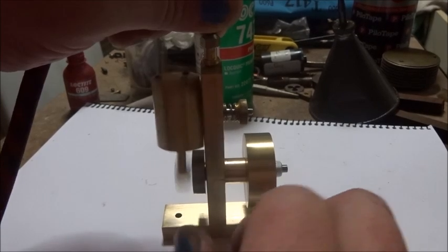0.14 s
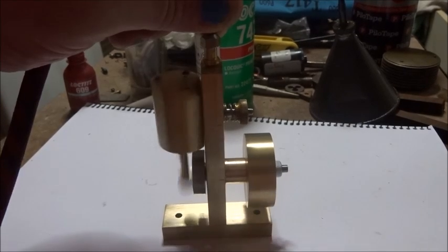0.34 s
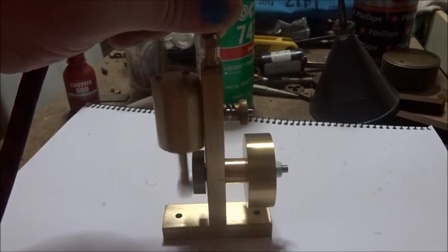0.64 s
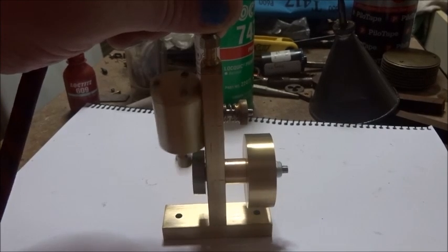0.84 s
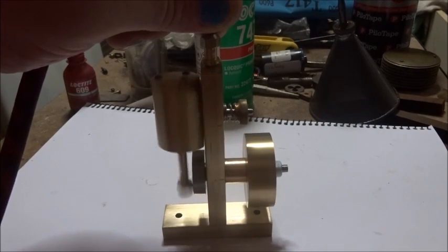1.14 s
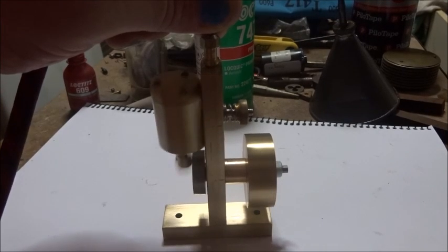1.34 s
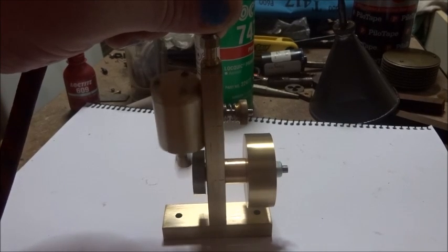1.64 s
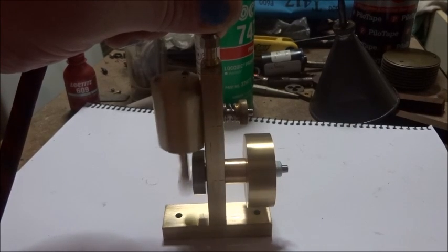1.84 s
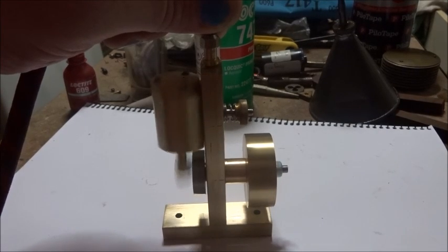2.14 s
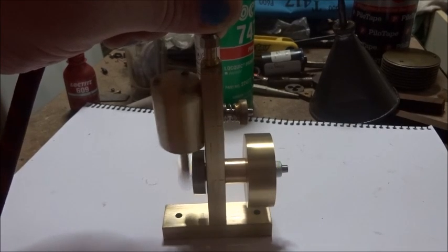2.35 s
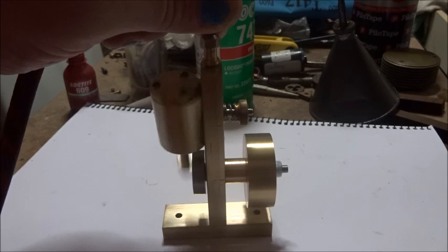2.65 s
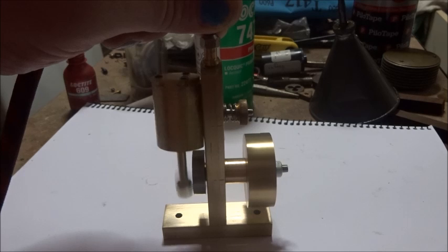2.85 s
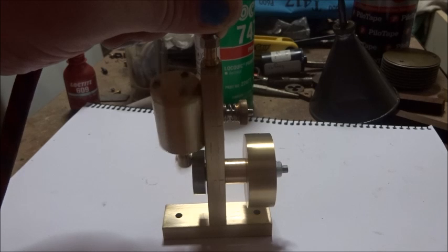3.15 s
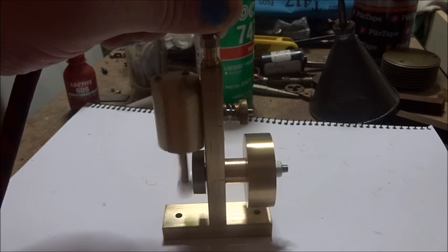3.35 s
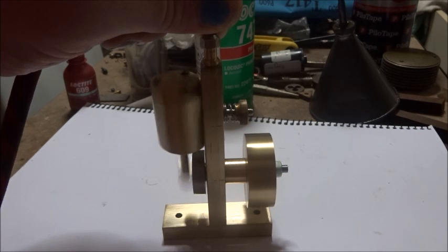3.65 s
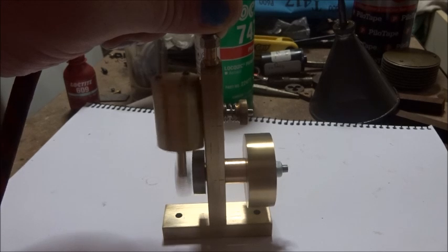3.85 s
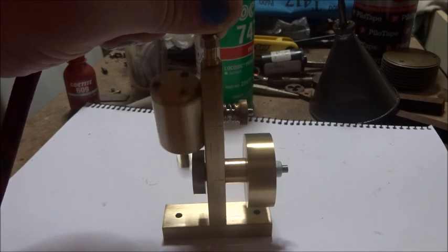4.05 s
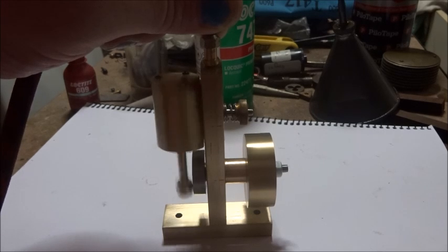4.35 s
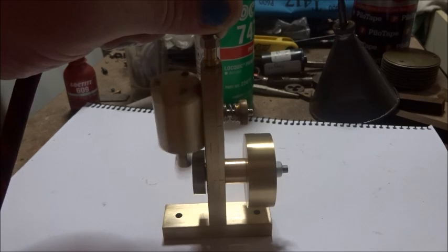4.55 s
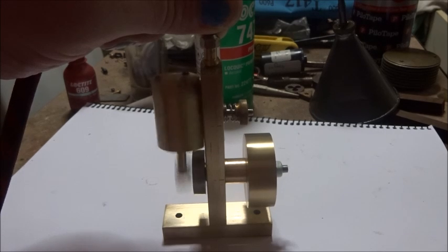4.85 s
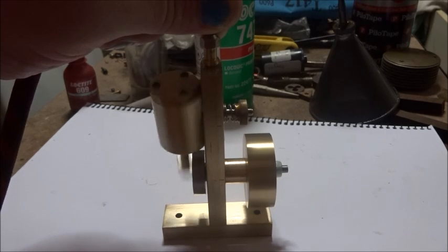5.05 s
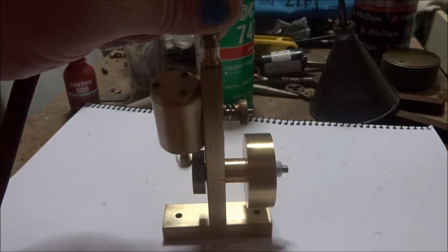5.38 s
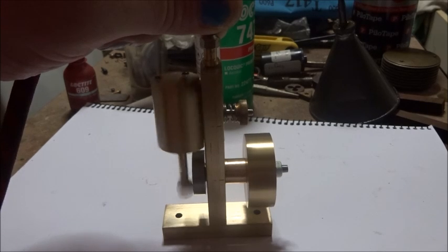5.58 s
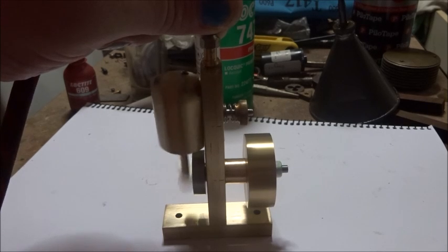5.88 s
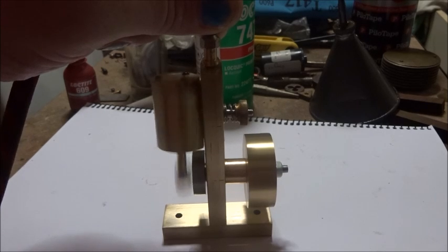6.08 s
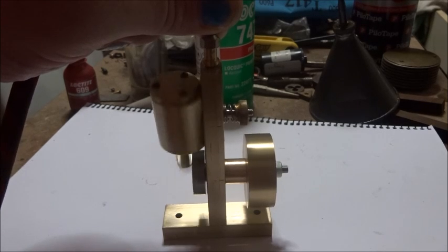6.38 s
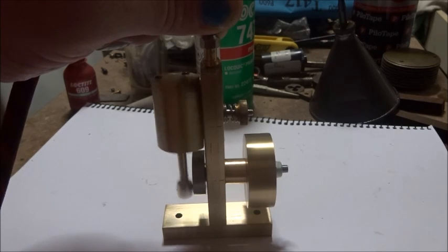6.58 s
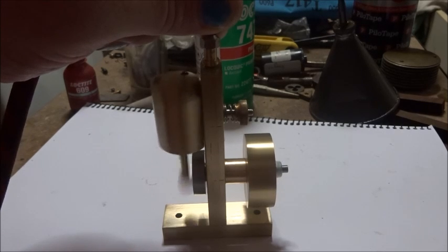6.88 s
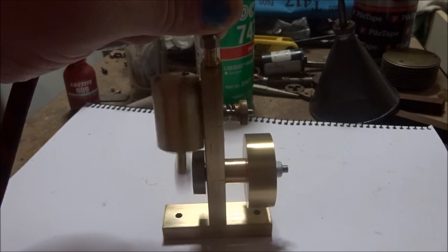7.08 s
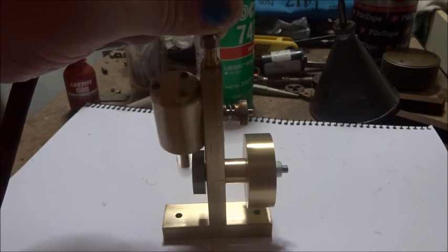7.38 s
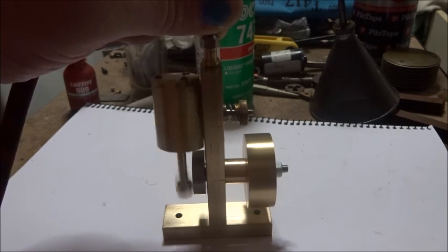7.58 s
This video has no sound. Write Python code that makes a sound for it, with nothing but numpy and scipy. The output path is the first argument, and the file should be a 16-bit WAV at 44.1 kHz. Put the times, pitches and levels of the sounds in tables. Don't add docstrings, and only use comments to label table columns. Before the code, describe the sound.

From 0 s a small brass engine is already running on compressed gas, on a wooden bench close to the microphone. It starts at about eleven turns a second, quickens to over twelve by 1 s, and settles near thirteen from about 2 s until it stops abruptly with the end near 7.7 s, still running. Every turn repeats one tight cycle: a dull crank knock in the wood, a thin inlet hiss, a millisecond-long piercing squeak near 14 kHz, then a strong bright exhaust puff with a second piston knock inside it and crisp metal ticks. Squeaks falter at the start, around 1.2 s and briefly near 4.3 s. Puffs and knocks vary slightly in strength, softer around 1 s and 2.9 s. Sliding brass rubs underneath; a faint low bench rumble gradually fades. The sound is dry, nearly mono, with only tiny close reflections.

```python
import sys
import numpy as np
from scipy import signal
from scipy.fft import rfft, irfft, next_fast_len
from scipy.io import wavfile
from scipy.ndimage import uniform_filter1d

SR = 44100
rng = np.random.default_rng(int(sys.argv[2]) if len(sys.argv) > 2 else 0)


def store_pcm(level_fs):
    pcm = np.round(np.clip(level_fs, -1, 1) * 32767).astype(np.int16)
    wavfile.write(sys.argv[1], SR, np.atleast_2d(pcm).T)


def natural_amplitude(level_db):
    exponent = np.asarray(level_db, float) / 20
    return 10 ** exponent


N = 340540

# (time [s], speed [turns/s], port cracks open [share of turn])
SPEED = [(0.0, 11.362, 0.4602), (0.37, 12.184, 0.4487), (1.14, 12.556, 0.4577), (1.44, 12.453, 0.4473),
         (1.78, 12.867, 0.4405), (2.1, 12.566, 0.4479), (2.29, 12.777, 0.4499), (3.01, 12.906, 0.433),
         (3.13, 12.873, 0.4379), (4.32, 12.869, 0.4427), (4.44, 13.155, 0.4344), (4.61, 12.97, 0.4544),
         (5.19, 12.938, 0.4403), (6.08, 12.956, 0.4395), (6.85, 12.998, 0.4521), (7.08, 12.792, 0.4524),
         (7.22, 13.037, 0.4487), (7.72, 12.655, 0.463)]
# (time [s], pressure [dB], slack [dB])
EFFORT = [(0, 0.9, -2.5), (.45, 1.5, -2), (.85, -.4, -4), (1.2, -0.5, 0), (1.55, -0.5, -2.5),
          (1.85, 0.5, 1.5), (2.15, 0.6, -1.5), (2.75, 1.3, 1), (2.92, -1, -1), (3.4, 0.7, .5),
          (3.75, 0.4, -2), (4.05, .3, 1.5), (4.3, 1.1, 0), (5.25, 1, 1), (6, 1, 1.5), (6.45, -0.3, 0.5),
          (7.25, 1.4, 1.8), (7.72, 0.5, -.5)]


def rms_one(x):
    return x / np.sqrt(np.mean(x ** 2) + 1e-20)


def curve(rows, s, column):
    rows = np.array(rows)
    return np.interp(s, rows[:, 0], rows[:, column])


def by_share(rows, share):
    at, *columns = np.transpose(rows)
    return [np.interp(share, at, c, period=1) for c in columns]


def colour(x, points):
    size = next_fast_len(N)
    hz, db = np.transpose(points)
    log_hz = np.log(np.fft.rfftfreq(size, 1 / SR) + 1)
    gain = natural_amplitude(np.interp(log_hz, np.log(hz), db))
    return irfft(rfft(x, size) * gain, size)[:N]


def flutter(rate):
    r = np.exp(-2 * np.pi * rate / SR)
    wander = signal.lfilter([1], [1, -2 * r, r * r], rng.standard_normal(N + SR))
    return rms_one(wander[SR:])


def ring(x, hz, t60):
    r, w = natural_amplitude(-60 / (t60 * SR)), 2 * np.pi * hz / SR
    return signal.lfilter([0, r * np.sin(w)], [1, -2 * r * np.cos(w), r * r], x + 1e-18)


def clicks(times, sizes):
    at, out = np.round(times * SR).astype(int), np.zeros(N)
    inside = (at >= 0) & (at < N)
    out[at[inside]] = sizes[inside]
    return out


def split(x, bright_db):
    top = signal.sosfilt(signal.butter(4, 11000, "high", fs=SR, output="sos"), x)
    low = signal.sosfilt(signal.butter(4, 11000, "low", fs=SR, output="sos"), x)
    return low + natural_amplitude(bright_db) * top


def crank():
    lead = SR // 10
    s = np.arange(-lead, N + SR // 5) / SR
    done = np.cumsum(curve(SPEED, s, column=1)) / SR
    done += .505 - done[lead]
    marks = np.interp(np.arange(101), done, s)
    angle = done[lead:][:N]
    return marks[:-1], np.diff(marks), angle, angle % 1


def gas(start, angle, share):
    # (place [share of turn], level [dB], brightness [dB])
    exhaust_port = [(.435, -31, -4), (.475, -5, -10), (.505, -4, -11), (.535, -1, -2.5), (.83, 1.5, -3),
                    (.885, -4, -7), (.918, 2, -11), (.955, -4, -7), (.99, -18.5, 0)]
    # (place [share of turn], level [dB], brightness [dB])
    inlet_port = [(.018, 1, 8), (.055, -3.5, 2), (.1, 1, 7.5), (.2, -1, -3), (.33, -0.5, -1),
                  (.42, -7.5, -1.5), (.46, -11.5, -5), (.53, -8, -4), (.975, -8, 4)]
    # (frequency [Hz], level per Hz [dB])
    exhaust_tone = [(2000, -32), (3500, -22), (4400, -21), (4800, -14.5), (5700, -15), (6700, -8),
                    (7300, -8.5), (8700, 1.5), (9500, -8), (10600, -3), (12500, -9), (13900, -3.5),
                    (14700, -5.5), (15800, -10.5)]
    # (frequency [Hz], level per Hz [dB])
    inlet_tone = [(1500, -8.5), (2500, -10.5), (3770, -3), (4400, -6), (5400, -6), (6400, -4), (8600, 1),
                  (9300, 1), (10300, 2), (12500, -4), (13900, -5), (14800, -3), (15800, -10.5)]

    puff_db = -17 + curve(EFFORT, start, column=1) + .5 * rng.standard_normal(len(start))
    puff_db = puff_db[angle.astype(int)]

    port_db, bright_db = by_share(exhaust_port, share)
    jet = split(rms_one(colour(rng.standard_normal(N), exhaust_tone)), bright_db)
    turbulence_db = 1.23 * flutter(600) + 0.53 * flutter(65)
    exhaust = natural_amplitude(puff_db - 2.5 + port_db + turbulence_db) * jet

    port_db, bright_db = by_share(inlet_port, share)
    leak = split(rms_one(colour(rng.standard_normal(N), inlet_tone)), bright_db)
    turbulence_db = 1.04 * flutter(300) + 0.29 * flutter(3.2)
    inlet_db = -28 + 0.61 * (puff_db + 15.5)
    inlet = natural_amplitude(inlet_db + port_db + turbulence_db) * leak
    return exhaust + inlet


def squeak(start, length):
    # (time [s], loss [dB])
    failed_squeaks = [(0, 30), (.08, 3), (.17, 5), (.34, 3), (.5, 0), (1.15, 19), (1.22, 8), (1.38, 11),
                      (4.28, 14), (4.35, 4.5), (5.51, 4)]
    span = np.arange(-300, 300)
    out, t = np.zeros(N), span / SR
    draws = rng.standard_normal((len(start), 5))
    cracks = start + (curve(SPEED, start, column=2) + .003 * draws[:, 3]) * length
    levels = -10 + .6 * curve(EFFORT, start, column=1) + .5 * draws[:, 4]
    for s, loss_db in failed_squeaks:
        levels[np.argmin(abs(cracks - s))] -= loss_db
    for s, db, draw in zip(cracks, levels, draws):
        hz = 13930 + 80 * draw[0] - 300 * natural_amplitude(2.5 * draw[1]) * np.tanh(t / .0008)
        width = np.where(t < 0, .0013, .0009)
        swell = natural_amplitude(db) / np.cosh(t / width) ** 1.01
        note = swell * np.sin(2 * np.pi * np.cumsum(hz) / SR + 3 * draw[2])
        at = round(s * SR) + span
        inside = (at >= 0) & (at < N)
        out[at[inside]] += note[inside]
    return out * natural_amplitude(.7 * flutter(500))


def knocks(start, length):
    # (frequency [Hz], t60 [s], crank knock [signed swing], return knock [signed swing])
    bench = [(78, 0.2, 0.001, -0.005), (113, 0.041, 0.029, -0.013), (146, 0.123, -0.01, 0.005),
             (188, 0.037, -0.064, 0.065), (230, 0.095, -0.059, 0.022), (257, 0.197, 0.0, -0.003),
             (284, 0.054, 0.101, -0.034), (351, 0.057, 0.039, -0.019), (432, 0.051, 0.001, 0.025),
             (442, 0.074, -0.029, 0.004), (493, 0.11, -0.019, 0.01), (509, 0.04, 0.007, -0.028),
             (628, 0.038, 0.014, 0.012), (835, 0.04, -0.02, -0.016), (965, 0.043, 0.003, 0.018),
             (1108, 0.032, -0.006, -0.027), (1217, 0.014, 0.022, 0.034), (1358, 0.025, -0.013, -0.012)]
    draw, out = rng.standard_normal((len(start), 3)), 0
    back = start + (.599 + .002 * draw[:, 0]) * length - .004
    down_db = 1.2 * curve(EFFORT, start, column=1) + .3 * draw[:, 1]
    up_db = 1.35 + curve(EFFORT, start, column=2) + .1 * draw[:, 2]
    for hz, t60, down, up in bench:
        vary = natural_amplitude(.5 * rng.standard_normal((len(start), 2)))
        blows = clicks(start - .00015, down * natural_amplitude(down_db) * vary[:, 0])
        blows += clicks(back, up * natural_amplitude(up_db) * vary[:, 1])
        out = out + ring(blows, hz, t60)
    soft = np.exp(-2 * np.pi * 1500 / SR)
    return signal.lfilter([1 - soft], [1, -soft], out)


def ticks(start, length):
    # (place [share of turn], frequency [Hz], t60 [s], level [dB], spread [dB])
    metal_ticks = [
        (0.01, 5000, 0.0018, -22, 2),
        (0.01, 2900, 0.0025, -35, 9),
        (0.526, 4200, 0.0033, -30.5, 2),
        (.57, 2900, 0.0057, -30.5, -0.5),
        (.66, 1150, 0.0052, -34, 4),
        (.9, 5950, 0.0064, -25.5, 1),
        (.9, 2900, 0.011, -34, 1.5),
        (.905, 1800, 0.0064, -37.5, -4.5),
        (0.028, 1120, 0.0086, -32.5, 3.5),
        (.965, 302, .008, -29.5, -2),
    ]
    out = 0
    for share, hz, t60, db, spread_db in metal_ticks:
        draw = rng.standard_normal((len(start), 2))
        times = start + (share + 0.0023 * draw[:, 0]) * length
        hits = clicks(times, natural_amplitude(db + spread_db * np.clip(draw[:, 1], -2, 1)))
        r = natural_amplitude(-60 / (t60 * SR))
        swell = signal.lfilter([np.e * (1 - r)], [1, -2 * r, r * r], hits)
        rattle = swell * rng.choice([-1, 1], N)
        band = signal.butter(2, [hz * 0.74, hz * 1.34], "band", fs=SR, output="sos")
        out = out + signal.sosfilt(band, rattle)
    return natural_amplitude(5.5) * out


def rubbing(share):
    # (place [share of turn], level [dB])
    load = [(.02, 0), (.32, -5.5), (.43, 0), (.49, -17), (.53, 1.5), (.9, -5.5), (.98, 1.5)]
    # (frequency [Hz], level per Hz [dB])
    rub_tone = [(20, -38), (50, -35), (100, -17), (170, -7), (430, -10), (480, -13), (620, -12), (780, -17),
                (1330, -16), (1520, -25), (3770, -22), (4400, -25), (6000, -18), (8000, -50)]
    # (frequency [Hz], width [Hz], level [dB])
    thin_rings = [(550, 11, -48.5), (971, 15.4, -48), (862, 29, -61), (245.5, 11.5, -52.5),
                  (1150, 140, -76)]
    noise = rms_one(colour(rng.standard_normal(N), rub_tone))
    pressure_db = curve(EFFORT, np.arange(N) / SR, column=1)
    level_db = -36.5 + 0.99 * pressure_db + by_share(load, share)[0] + flutter(113)
    out = natural_amplitude(level_db) * noise
    for hz, width, db in thin_rings:
        t60 = np.log(1000) / (np.pi * width)
        out += natural_amplitude(db) * rms_one(ring(rng.standard_normal(N), hz, t60))
    return out


def rumble():
    fade = natural_amplitude(-41 - 3 * np.arange(N) / SR)
    boards = rms_one(ring(ring(rng.standard_normal(N), 150.5, 0.062), 182, 0.047))
    hum = rms_one(ring(rng.standard_normal(N), 243.3, 0.23))
    return fade * (boards + natural_amplitude(-5) * hum)


def near_echoes(x):
    # (delay [ms], level [dB])
    bounces = [(.7, -50), (1.9, -42), (2.6, -32), (5.3, -27)]
    out = x.copy()
    for delay_ms, db in bounces:
        lag = round(delay_ms * SR / 1000)
        out[lag:] += natural_amplitude(db) * x[:-lag]
    return out


def scattered(x):
    parts = signal.stft(x, nperseg=512)[2]
    parts = np.abs(parts) * np.exp(2j * np.pi * rng.random(parts.shape))
    return rms_one(signal.istft(parts)[1][:N]) * np.std(x)


def scene():
    # (frequency [Hz], side minus mid [dB])
    stereo_width = [(30, -24), (70, -36), (140, -31.5), (280, -17.5), (550, -15.5), (1100, -17.5),
                    (2200, -26), (3000, -31), (6500, -18), (12500, -12), (14000, -16.5), (15500, -7)]
    start, length, angle, share = crank()
    airborne = near_echoes(gas(start, angle, share) + squeak(start, length) + ticks(start, length))
    mid = airborne + knocks(start, length) + rubbing(share) + rumble()
    side = colour(scattered(mid), stereo_width)
    return np.array([mid + side, mid - side])


def patchy_side(side, mid):
    hz, _, parts = signal.stft(side, SR, nperseg=512)
    top = np.abs(signal.stft(mid, SR, nperseg=512)[2][150:175]).sum(axis=0)
    frame = np.arange(parts.shape[1]) // 4
    band = np.searchsorted(1600 * 1.16 ** np.arange(17), hz)
    rise = np.diff(np.log(top + 1e-9), prepend=0)
    attack = np.bincount(frame, np.maximum(rise - .5, 0))
    held = uniform_filter1d(rng.standard_normal((18, frame[-1] + 1)), size=3, axis=1) * 1.7
    odds = held + .9 * rng.standard_normal(frame[-1] + 1) + .9 * np.minimum(attack, 2)
    keep = (odds > 1.2)[band][:, frame] | (band == 0)[:, None]
    return signal.istft(parts * keep)[1][:N]


def band_limit(x):
    return signal.sosfilt(signal.butter(12, 16800, fs=SR, output="sos"), x)


def record(dry):
    heard = signal.sosfilt(signal.butter(2, 50, "high", fs=SR, output="sos"), dry)
    heard = heard - .3 * signal.lfilter(*signal.iirpeak(4400, 12, fs=SR), heard)
    rounded = .75 * np.tanh(heard / .75)
    cut = signal.sosfilt(signal.ellip(8, .3, 42, 15750, fs=SR, output="sos"), rounded)
    mid = cut.mean(axis=0)
    side = patchy_side((cut[0] - cut[1]) / 2, mid)
    return band_limit(np.array([mid + side, mid - side]))


dry = scene()
out = record(dry)
store_pcm(out)
```